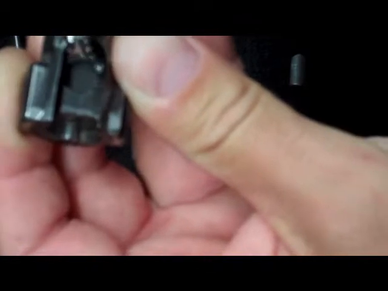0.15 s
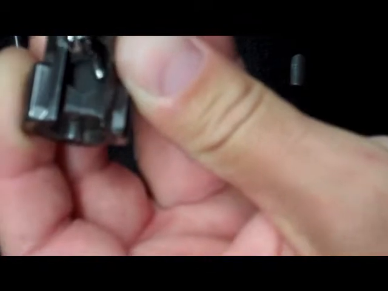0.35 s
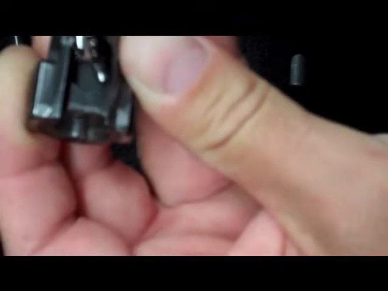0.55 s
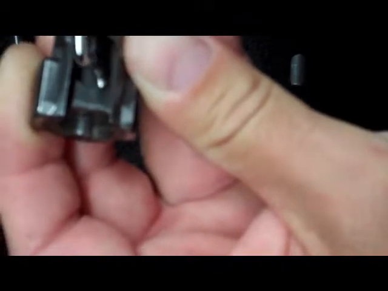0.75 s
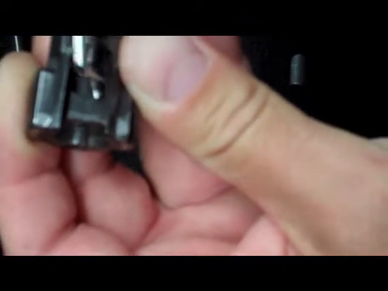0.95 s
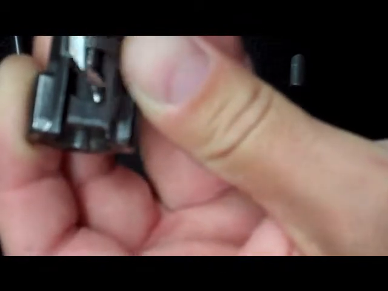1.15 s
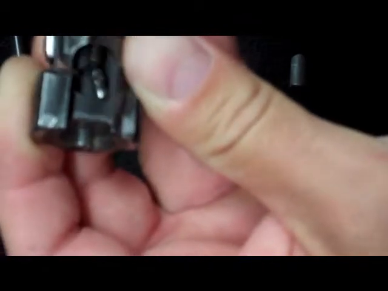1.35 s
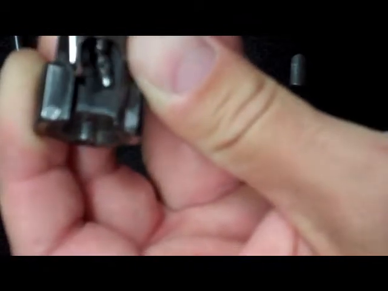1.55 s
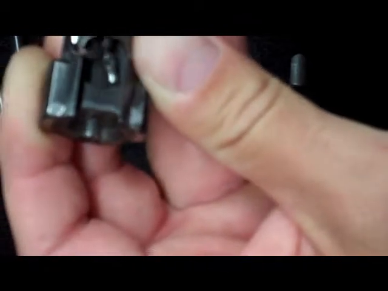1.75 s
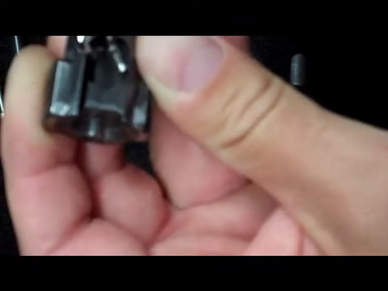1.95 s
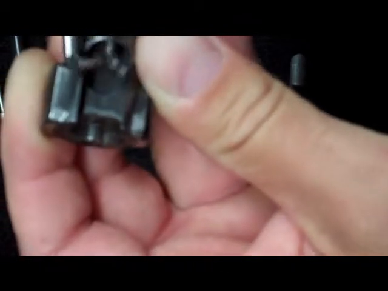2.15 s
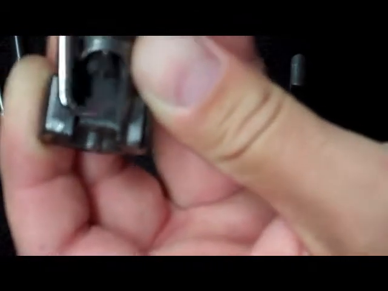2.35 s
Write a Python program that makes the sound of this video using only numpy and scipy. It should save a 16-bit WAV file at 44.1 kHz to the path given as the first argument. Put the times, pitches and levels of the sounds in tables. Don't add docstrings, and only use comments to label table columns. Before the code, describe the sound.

Close metallic ticks, then sharper clicks and short gritty scrapes as fingers work a small steel part

```python
import sys
import numpy as np
from scipy import signal
from scipy.fft import rfft, irfft
from scipy.io import wavfile
from scipy.ndimage import uniform_filter1d

SR = 44100
rng = np.random.default_rng(int(sys.argv[2]) if len(sys.argv) > 2 else 0)


def makeup_ratio(level_db):
    decades = np.asarray(level_db, float) / 20
    return 10 ** decades


def digitize_waveform(pressure):
    field = np.atleast_2d(pressure).T
    bounded = np.clip(field, -1, 1)
    quanta = np.round(bounded * 32767).astype(np.int16)
    wavfile.write(sys.argv[1], SR, quanta)


N = 110250
TOP_HZ = 14250


def band(x, hz, width_hz):
    return signal.lfilter(*signal.iirpeak(hz, hz / width_hz, SR), x)


def ring(strike, modes):
    total = 0
    for hz, db, t60_s in modes:
        pole = np.exp((2j * np.pi * hz - np.log(1000) / t60_s) / SR)
        total = total + makeup_ratio(db) * signal.lfilter([1], [1, -pole], strike + 0j).imag
    return total


def colour(points, channels):
    hz, db = np.array(points).T
    f = np.arange(N // 2 + 1) * SR / N + 1
    density = makeup_ratio(np.interp(np.log(f), np.log(hz), db))
    spectrum = rfft(rng.standard_normal((channels, N))) * (f < TOP_HZ) * density
    return irfft(spectrum, N) * np.sqrt(SR / 2)


def walk(per_s):
    k = int(SR / per_s)
    steps = np.repeat(rng.standard_normal(N // k + 1), k)
    return uniform_filter1d(uniform_filter1d(steps, k), k)[:N]


# pitch_hz, density_db_per_hz
HISS = [(20, -77), (300, -96), (1000, -100), (3000, -103.5), (8000, -108), (14000, -110)]


def amplifier_hiss():
    left_db = -2.5
    return colour(HISS, channels=2) * makeup_ratio(np.array([[left_db], [0]]))


# pitch_hz, level_db, wander_db
HUM = [
    (119.46, -57, 3.5),
    (136.85, -54, 2.5),
]
# pitch_hz, width_hz, level_db
AIR_MODES = [(34, 6, -70), (100, 14, -68), (196, 14, -66), (223, 6, -68)]
# pitch_hz, density_db_per_hz
AIR = [(15, -84.5), (60, -76), (160, -83), (300, -82), (600, -93), (1050, -94), (1300, -102), (4000, -125)]


def room_tone():
    t = np.arange(N) / SR
    tone = np.zeros(N)
    for hz, db, wander_db in HUM:
        level = makeup_ratio(db + wander_db * walk(7.14))
        tone += np.sqrt(2) * level * np.sin(2 * np.pi * (hz * t + rng.random()))
    for hz, width_hz, db in AIR_MODES:
        unit_level = np.sqrt(SR / width_hz / np.pi)
        tone += makeup_ratio(db) * unit_level * band(rng.standard_normal(N), hz, width_hz)
    return 1.257 * tone + colour(AIR, channels=1)[0]


def room_reflections(metal):
    t60_s, level_db = .14, -40
    t = np.arange(9000) / SR
    tails = makeup_ratio(level_db) * rng.standard_normal((2, len(t))) * np.exp(-np.log(1000) * t / t60_s)
    return signal.fftconvolve(metal[None], tails, axes=1)[:, :N]


# pitch_hz, sharpness, level_db
PORTS = [
    (7270, 3.7, 0.5),
    (5790, 5.8, 6.5),
]


def ports(at):
    heard = []
    for x, (hz, sharpness, db) in zip(at, PORTS):
        w = 2 * SR * np.tan(np.pi * hz / SR)
        cavity = signal.bilinear([w * w], [1, w / sharpness, w * w], SR)
        heard.append(makeup_ratio(db) * signal.lfilter(*cavity, x))
    return np.array(heard)


# pitch_hz, level_db, t60_s
PIN = [(3225, -21, .26), (3262, -26, .16)]
# pitch_hz, level_db, t60_s
COLLAR = [(6648, -7, .19), (6682, -13, .1)]
# pitch_hz, level_db, t60_s
SPRING = [(8160, -3, .08)]
# start_s, pin_db, collar_db, spring_db
RINGS = [(.2247, -57, -60, -52), (.3789, -43, -49, -64), (.4807, -47, -50, -70), (.7524, -47, -50, -72),
         (1.0508, -58, -56, -64), (1.1356, -75, -68, -55), (1.4636, -42, -48, -52), (1.5261, -38, -39, -47),
         (1.5657, -49, -62, -64), (1.7944, -54, -60, -75), (1.8184, -50, -60, -42), (2.1234, -43, -49, -39),
         (2.201, -33, -42, -42), (2.2307, -40, -39, -45), (2.265, -43, -57, -60), (2.2944, -45, -48, -55)]


def loose_parts():
    strikes = np.zeros((3, N))
    for start_s, *db in RINGS:
        strikes[:, int(start_s * SR)] = makeup_ratio(np.array(db))
    return sum(ring(x, modes) for x, modes in zip(strikes, (PIN, COLLAR, SPRING)))


# start_s, length_s, peak_place (0-1)
SLIDES = [(.141, .009, .2), (.222, .05, .8), (.27, .045, .3), (.48, .032, .3), (.536, .02, .3),
          (.559, .027, .4), (.6, .04, .3), (.718, .039, .7), (.755, .075, .3), (.905, .055, .6),
          (.958, .035, .45), (1.05, .058, .3), (1.124, .018, .6), (1.14, .06, .3), (1.463, .015, .2),
          (1.499, .021, .65), (1.527, .03, .1), (1.56, .047, .5), (1.795, .05, .3), (2.08, .038, .7),
          (2.116, .015, .4), (2.158, .038, .6), (2.201, .031, .8), (2.231, .055, .06), (2.282, .018, .6),
          (2.298, .04, .1)]
SLIDE_DB = [-56, -45, -56, -49, -58, -60, -66, -46, -56, -68, -53, -45.5, -50, -66, -46, -38, -49, -46, -43,
            -48, -36, -49, -35, -38, -35, -53]


def slides():
    grains_per_s, spread_db = 9000, 2
    stick_db, stick_per_s = 3, 350
    t, pressure = np.arange(N) / SR, np.zeros(N)
    for (start_s, length_s, peak), db in zip(SLIDES, SLIDE_DB):
        corners_s = [start_s, start_s + length_s * peak, start_s + length_s]
        pressure += makeup_ratio(db) * np.interp(t, corners_s, [0, 1, 0])
    chance, size, side = rng.random((3, N))
    grain = makeup_ratio(-spread_db * np.log(size + 0.014)) * np.sign(side - .5)
    grit = (chance < grains_per_s / SR) * grain
    return pressure * makeup_ratio(stick_db * walk(stick_per_s)) * grit


# start_s, peak_db, knock_db, bright_edge_db
CONTACTS = [(.141, -33.5, -39, -14), (.2247, -33.5, -51, -10), (.2393, -31, -51, -5.5),
            (.3789, -30, -37, -2.5), (.4807, -38.5, -35, 1), (.7524, -34.5, -35, -1),
            (.9738, -36, -25.5, -4.5), (1.0508, -40, -40, 6.5), (1.1356, -36.5, -29, -10),
            (1.4636, -21, -36, -9), (1.5261, -17, -21, -4), (1.7944, -27, -34, -11), (1.8085, -27, -34, -8),
          (1.8184, -23, -45, -9), (1.8258, -35, -10, -7), (2.0805, -41, -18, -7), (2.1844, -31, -30, -9),
          (2.201, -20, -30, -15), (2.2307, -12, -27, -9)]
# start_s, peak_db
CATCHES = [(0.1449, -46), (0.2511, -43), (0.259, -43), (0.2631, -39), (0.382, -44), (0.4918, -39),
           (0.4947, -41), (0.5027, -40), (0.5078, -40), (0.5677, -42), (0.5721, -45), (0.7218, -48),
           (0.7381, -38), (0.7439, -39), (0.749, -38), (0.9701, -46), (1.0658, -39), (1.0779, -40),
           (1.1261, -48), (1.4685, -31), (1.5107, -30), (1.5144, -33), (1.5297, -38), (1.5383, -43),
           (1.5477, -43), (1.5569, -45), (1.5652, -45), (1.5701, -42), (1.5738, -42), (1.5767, -40),
           (1.5817, -42), (1.5891, -41), (1.5934, -41), (1.5997, -46), (1.8028, -37), (1.832, -44),
           (2.0938, -48), (2.106, -45), (2.1197, -29), (2.1234, -29), (2.1969, -41), (2.2235, -28),
           (2.2276, -26), (2.2352, -27), (2.2472, -33), (2.2499, -35), (2.2559, -35), (2.2684, -39),
           (2.2769, -41), (2.2802, -39), (2.2829, -39), (2.2935, -25), (2.3054, -48)]
# pitch_hz, level_db, t60_s
BODY = [(1150, 0, .012), (1600, -3, .008), (2100, -2, .012), (2600, -3, .006), (2100, -21, .07)]


def hits():
    contact_s, contact_db = .0004, -8
    rattle_s, rattle_db = .002, -18
    edge_s, edge_fizz_db = .0012, -8
    catches = [(s, db + 2, -36, -14) for s, db in CATCHES]
    rows = CONTACTS + catches
    t = np.arange(600) / SR
    press = makeup_ratio(contact_db) * t / contact_s * np.exp(1 - t / contact_s)
    rattle = makeup_ratio(rattle_db) * np.exp(-t / rattle_s)
    push, edge, knock = np.zeros((3, N + len(t)))
    for start_s, db, knock_db, edge_db in rows:
        i = int(start_s * SR)
        grain = rng.standard_normal(len(t))
        shape = grain * (press + rattle)
        shape[2] = 3
        shape = 3 * makeup_ratio(db) * shape / np.sqrt(np.sum(shape ** 2))
        fizz = makeup_ratio(db + edge_fizz_db) * grain * np.exp(-t / edge_s)
        push[i:i + len(t)] += shape
        edge[i:i + len(t)] += makeup_ratio(edge_db) * (shape / 2 + fizz)
        knock[i] = makeup_ratio(db + knock_db)
    return push[:N], edge[:N], ring(knock[:N], BODY)


def scene():
    push, edge, knocks = hits()
    grit = slides()
    slide_rings = makeup_ratio(-47) * ring(grit, PIN + COLLAR + SPRING)
    slide_knocks = makeup_ratio(-45) * ring(grit, BODY)
    rings = knocks + loose_parts() + slide_rings + slide_knocks
    clank_band = signal.butter(3, [4200, 8900], "band", fs=SR, output="sos")
    clank = signal.sosfilt(clank_band, push + grit)
    body_low_hz = 850
    metal = clank + signal.lfilter(*signal.butter(2, body_low_hz, "high", fs=SR), rings)
    spark = np.diff(edge + makeup_ratio(-19) * grit, prepend=0)
    edge_left_db, air_left_db = 4, -7.5
    at = metal + room_reflections(metal)
    at = at + spark * makeup_ratio(np.array([[edge_left_db], [-edge_left_db]]) / 2)
    at[1] -= .8 * band(at[1], 7500, 1800)
    return ports(at) + room_tone() * makeup_ratio(np.array([[air_left_db], [0]]))


def low_pass(x):
    return signal.sosfilt(signal.butter(12, 16650, fs=SR, output="sos"), x)


def record(dry):
    top_db, cut_hz = -9, 16550
    f = np.arange(N // 2 + 1) * SR / N
    response = np.where(f < TOP_HZ, 1, makeup_ratio(top_db)) * (f < cut_hz)
    mix = irfft(rfft(dry) * response, N) + amplifier_hiss()
    return low_pass(mix)


dry = scene()
out = record(dry)
digitize_waveform(out)
```